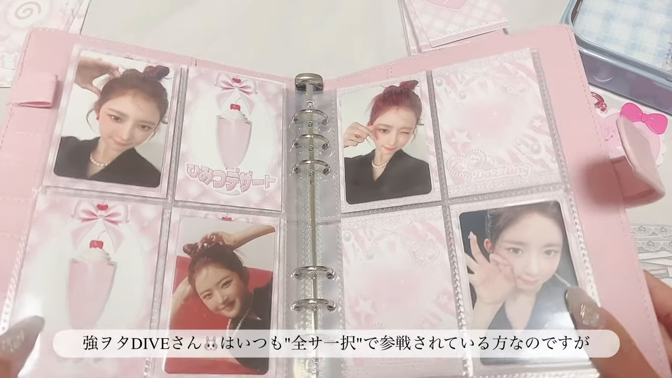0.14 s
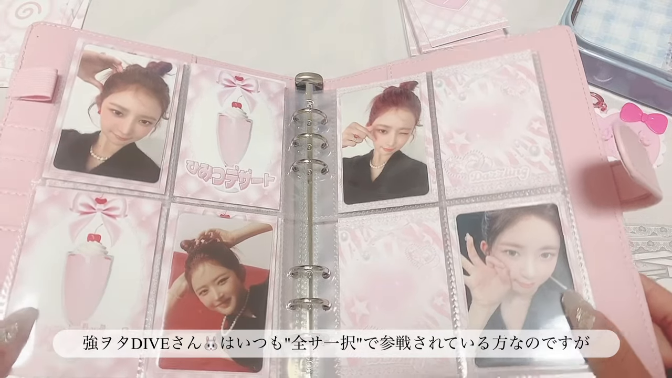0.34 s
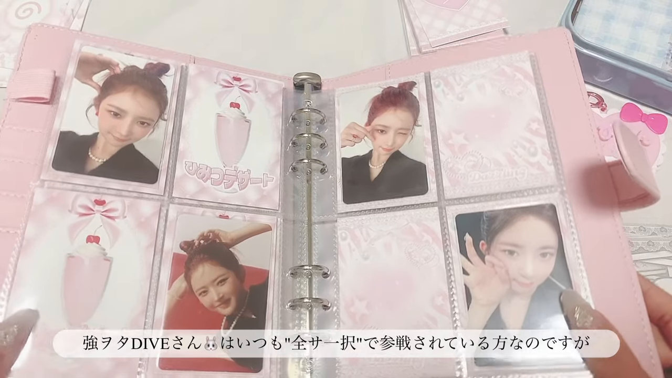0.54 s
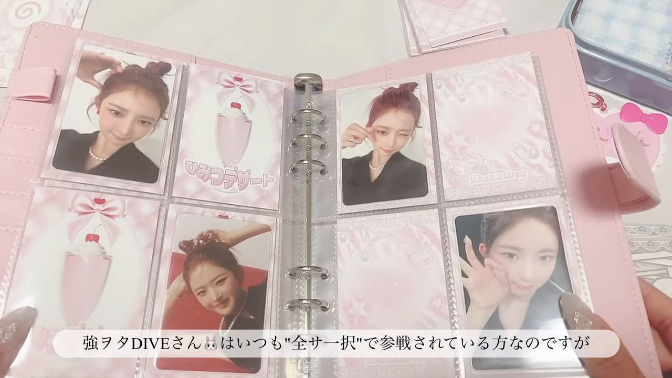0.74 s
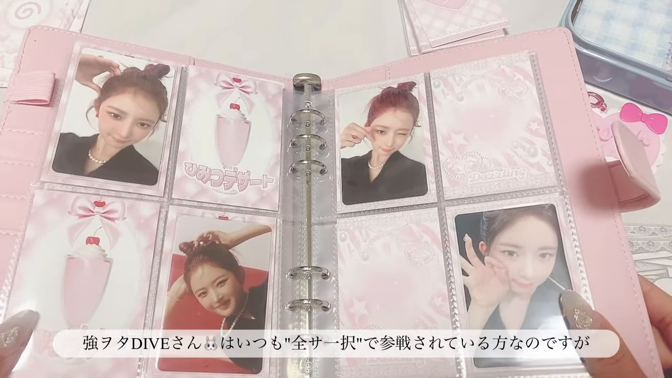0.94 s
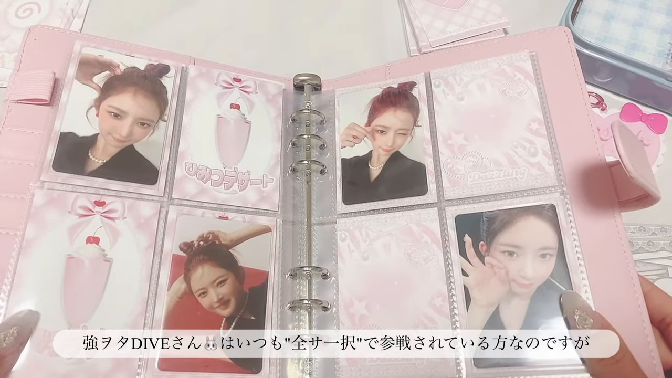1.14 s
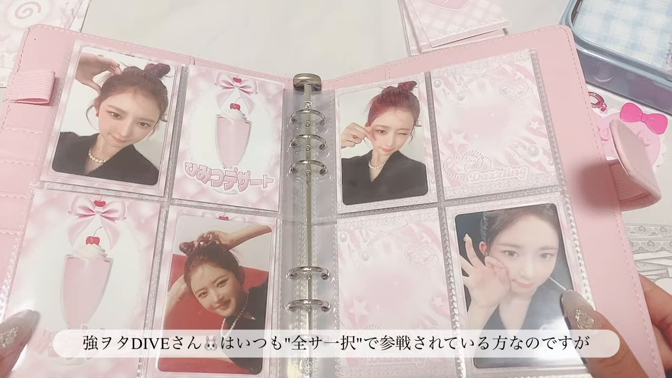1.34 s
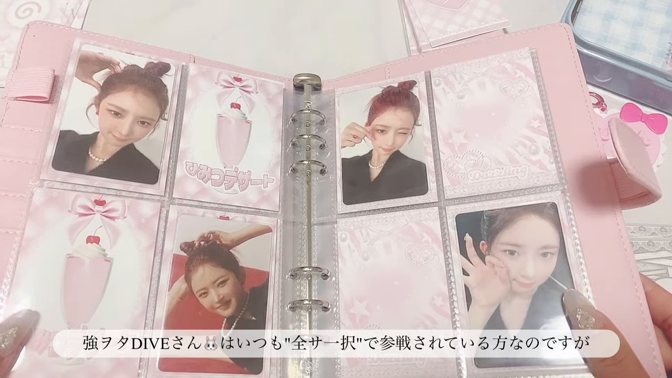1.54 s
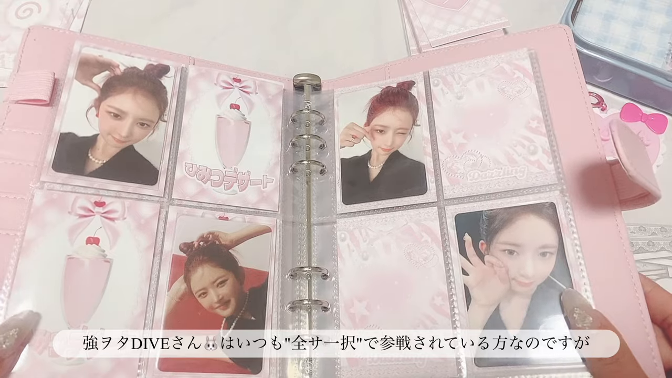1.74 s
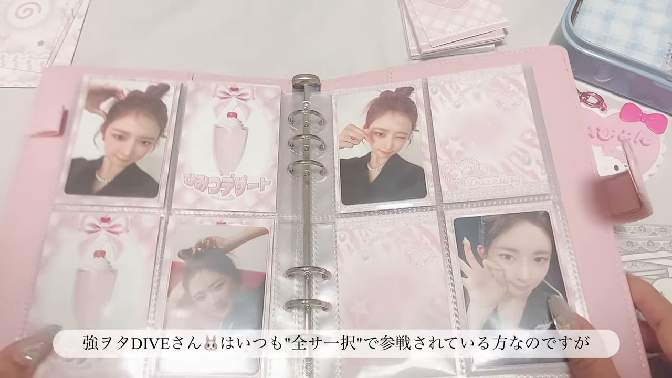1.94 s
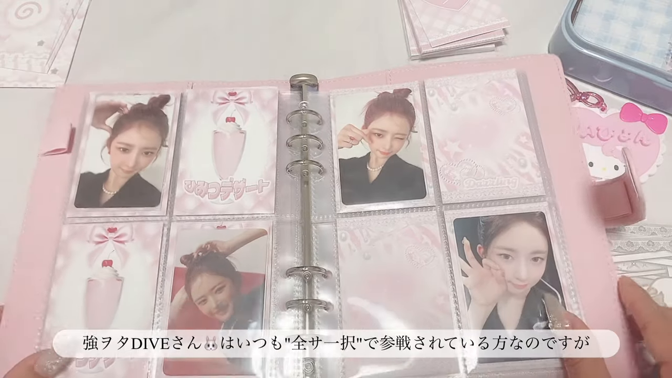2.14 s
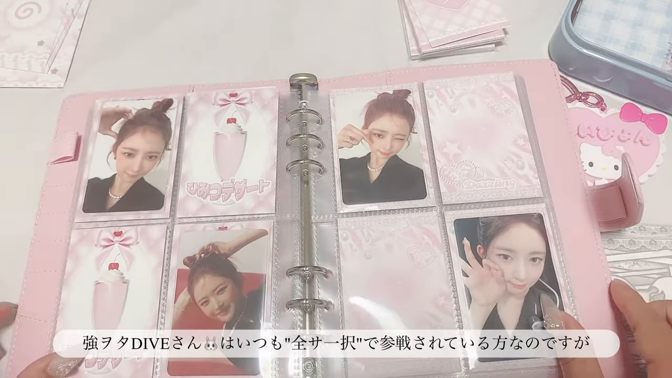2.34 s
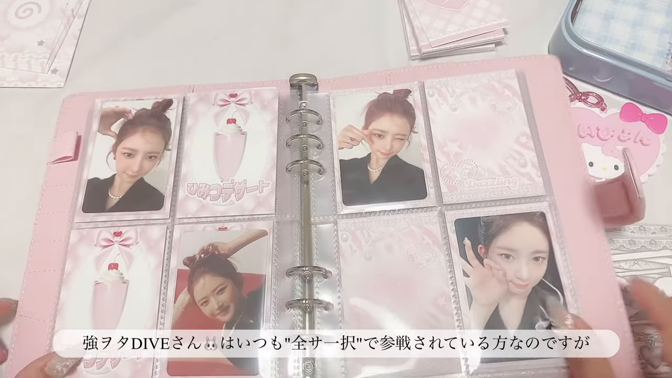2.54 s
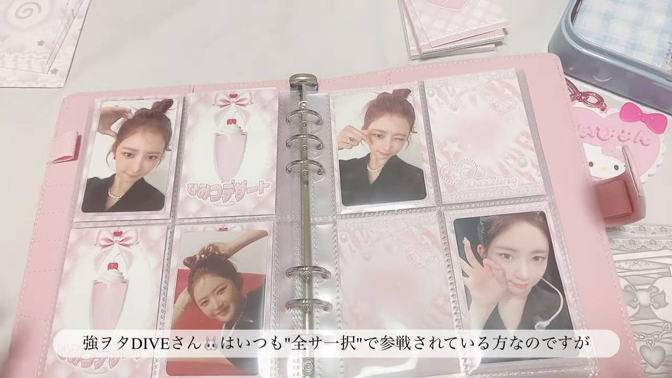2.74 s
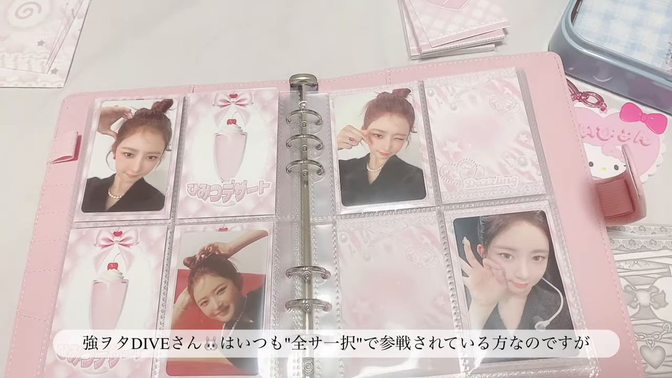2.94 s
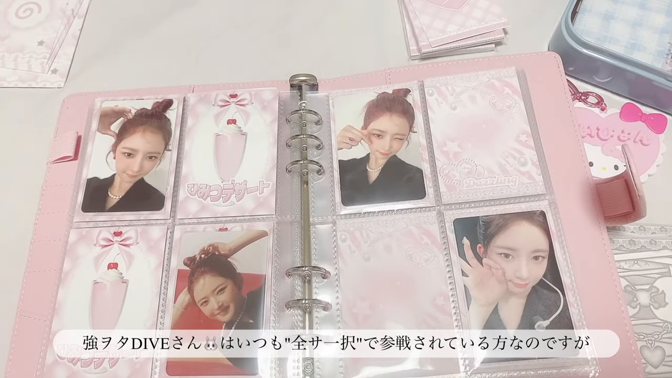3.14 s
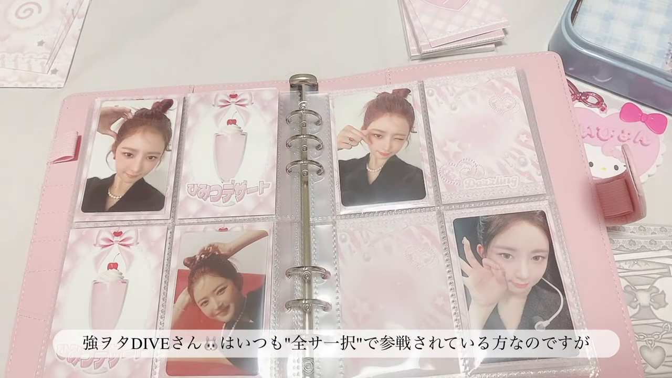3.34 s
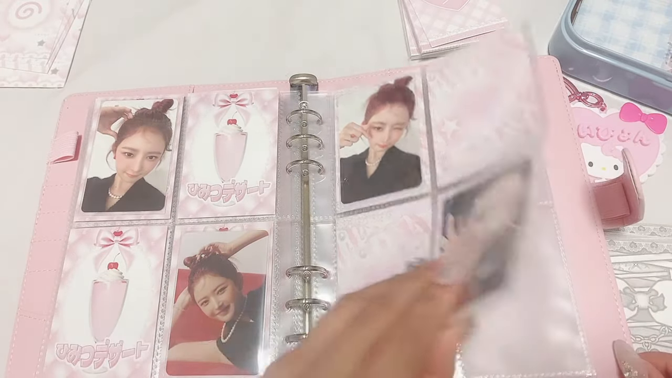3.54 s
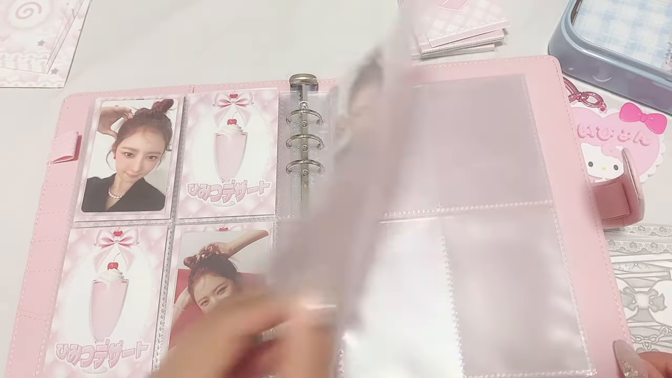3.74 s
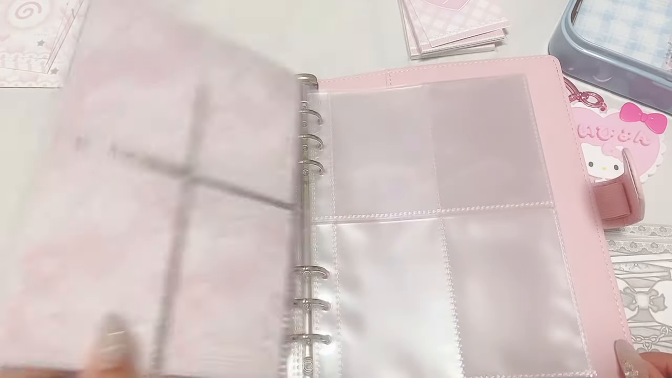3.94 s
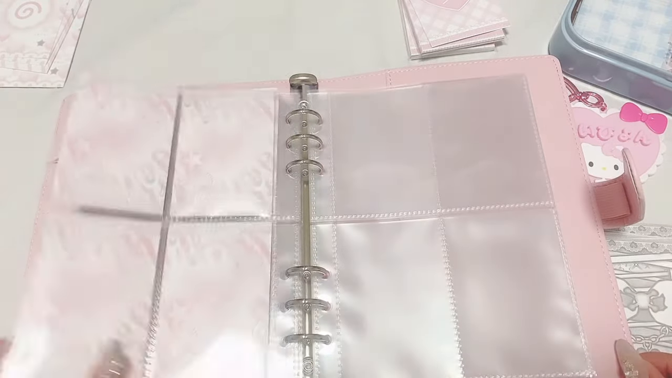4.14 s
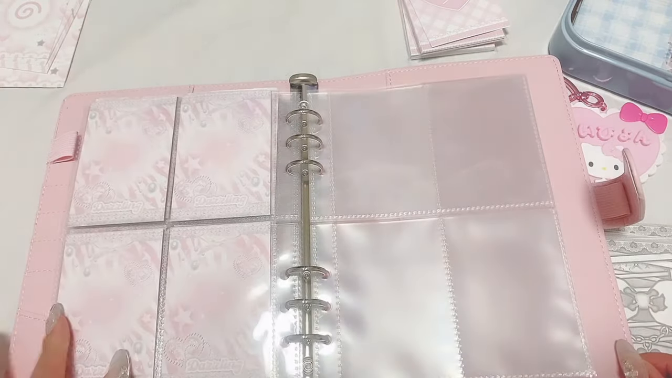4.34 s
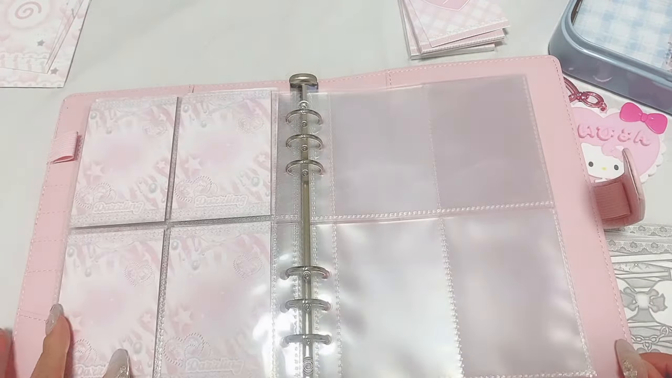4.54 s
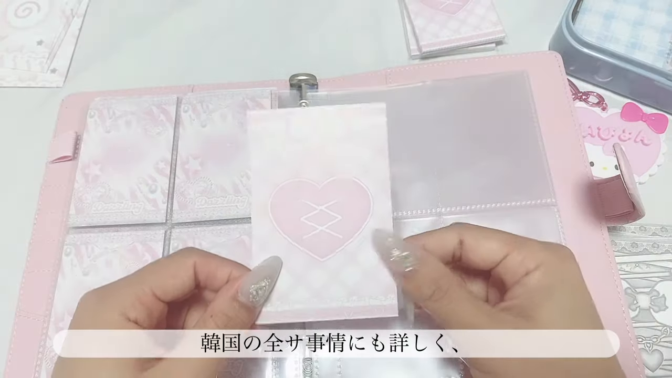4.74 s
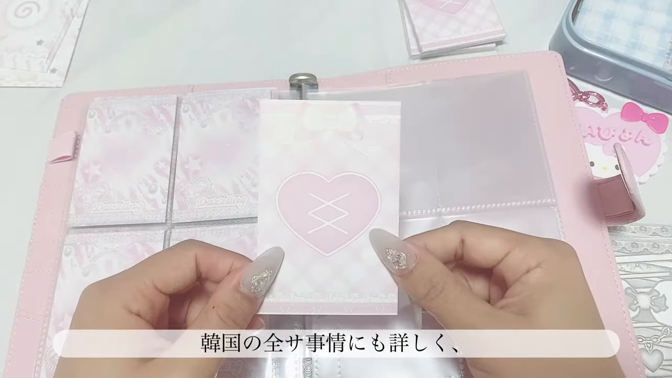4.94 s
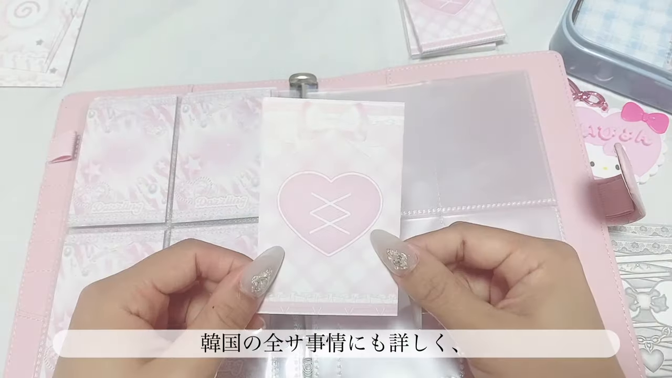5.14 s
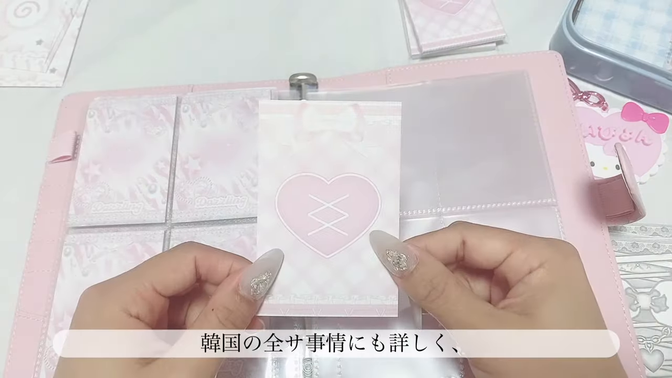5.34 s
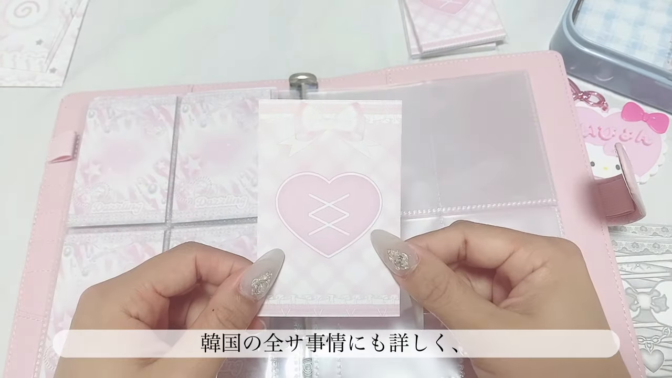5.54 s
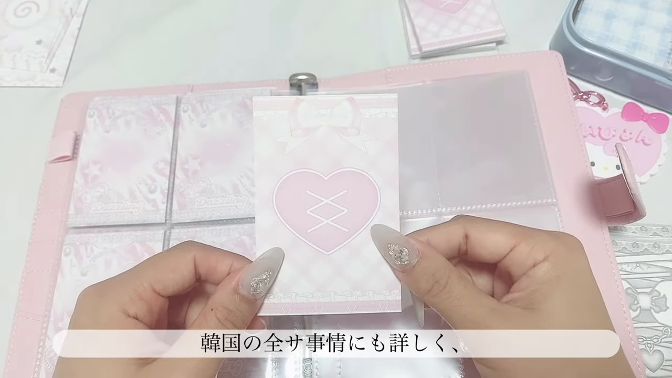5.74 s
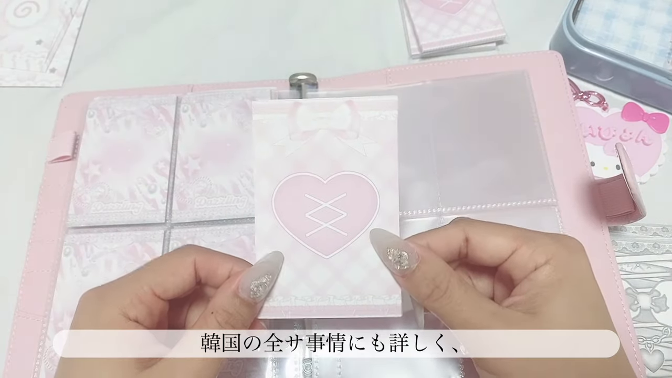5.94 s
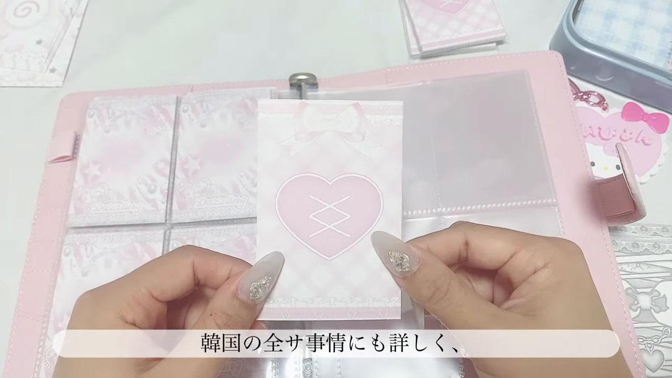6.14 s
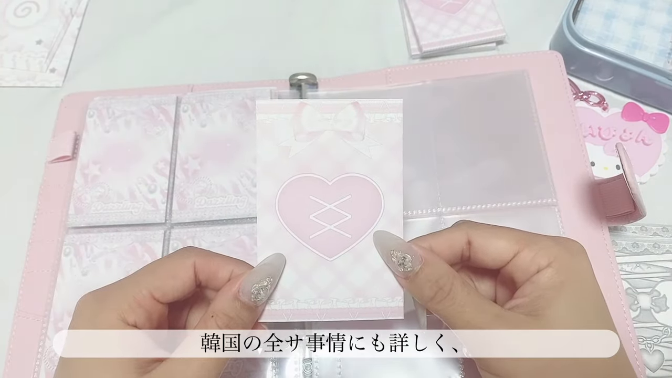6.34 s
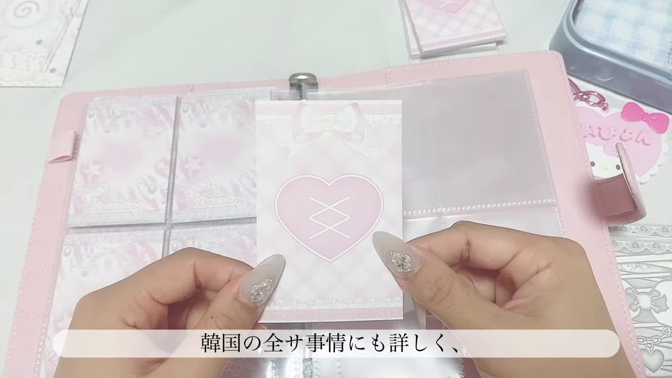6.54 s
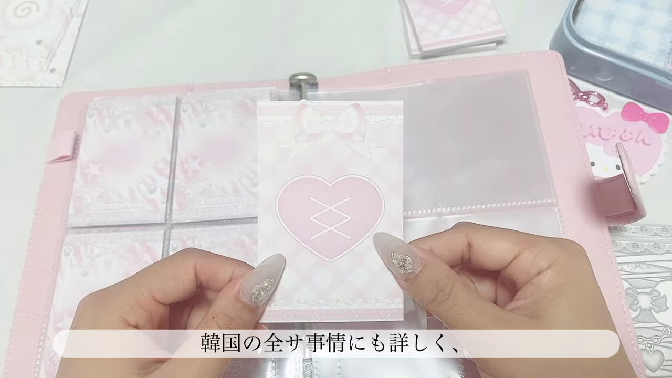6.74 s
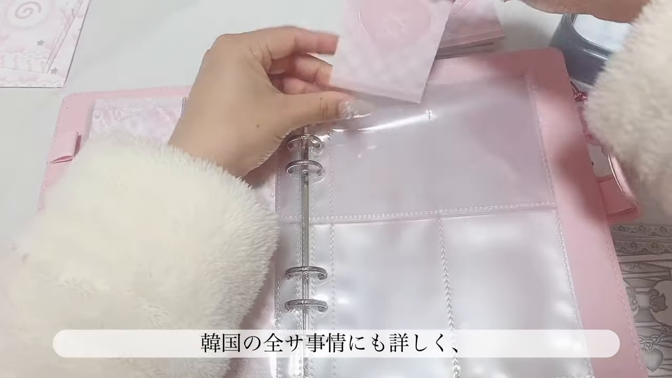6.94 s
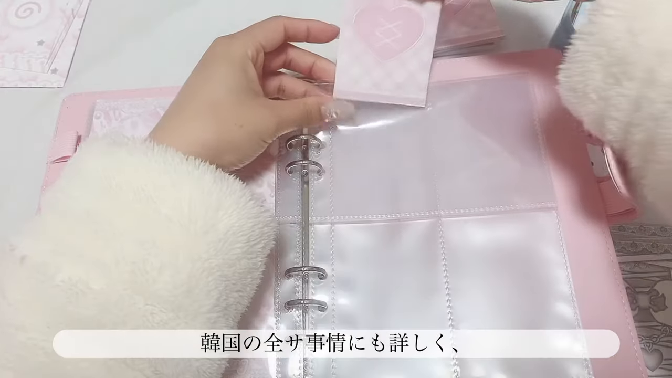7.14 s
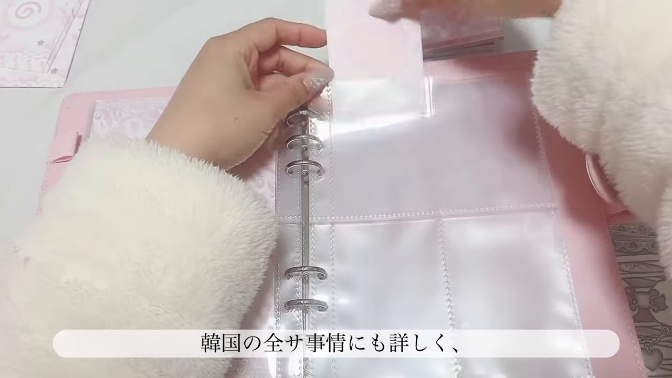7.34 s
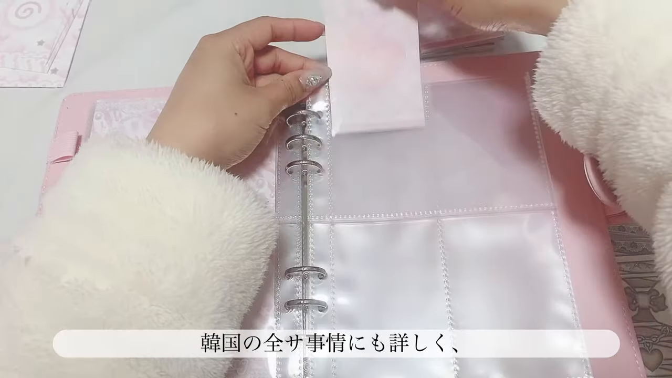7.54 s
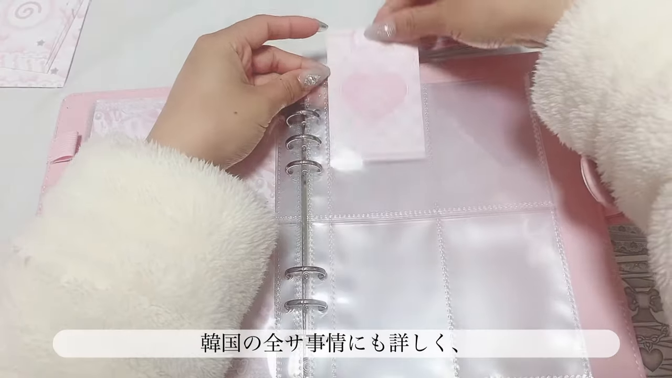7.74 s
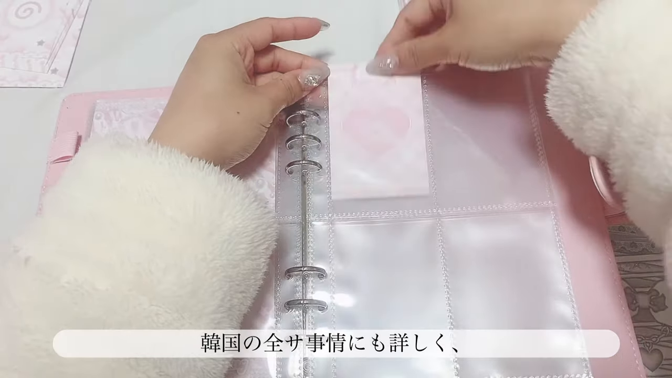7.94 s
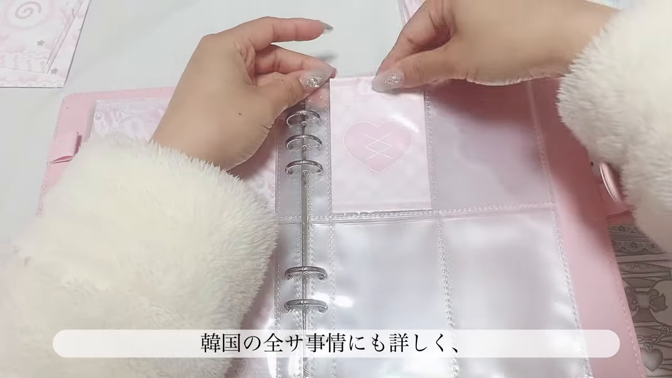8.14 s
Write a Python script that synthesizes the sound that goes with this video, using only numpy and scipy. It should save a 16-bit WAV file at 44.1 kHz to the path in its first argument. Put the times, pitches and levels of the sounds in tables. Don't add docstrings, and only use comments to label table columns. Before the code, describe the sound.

A close, dry, bright sound in a quiet room with faint low hum and hiss. From 0 to 0.8 s, hands make soft brushing rubs on plastic, then near stillness. From about 1.8 s a binder is shifted: small nail ticks, muted knocks and light friction, with a very faint, wavering high whistle of film around 2.4-2.8 s. A brief brighter rub comes at 3.3 s. At 3.7 s a stiff plastic page turns with a very loud crack, a dense crackling run at 3.8 s, and scattered sharp snaps until 4.2 s; it lands with a hard slap at 4.3 s and a smaller settling click near 4.5 s. Faint ticks and tiny squeaks fade by 5 s, leaving quiet. A soft tap at 6.7 s precedes plastic clicks at 6.9 s; a card then scrapes into a pocket, with a knock at 7.4 s, crisp snaps near 7.5 s and rustling slides until 8 s.

```python
import sys
import numpy as np
from scipy import signal
from scipy.fft import rfft, irfft, next_fast_len
from scipy.io import wavfile
from scipy.ndimage import uniform_filter1d

SR = 44100
rng = np.random.default_rng(int(sys.argv[2]) if len(sys.argv) > 2 else 0)


def file_out(sig):
    cols = np.atleast_2d(sig).T
    lim = np.clip(cols, -1, 1)
    pcm = np.round(lim * 32767).astype(np.int16)
    wavfile.write(sys.argv[1], SR, pcm)


def volts(x):
    e = np.asarray(x, float) / 20
    return 10 ** e


N = 361619

# f/Hz, bandwidth/Hz, level/dB
PORT_TOP = [(12500, 1380, -11), (14670, 1400, 1)]
PORT_WIDE = [(7730, 2300, -4), (9400, 980, 2.5), (10940, 780, -3.5)]
SHEET = [(2000, 650, -4), (2700, 290, 1), (3070, 650, -1.5), (4500, 1100, -1), (5400, 400, -0.5),
         (6400, 640, -10.5)]
COVER = [(420, 550, -1.5), (954, 577, 1.7), (1450, 536, -2.5)]


def snaps():
    # t/s, crack peak level/dB, sheet peak level/dB, sheet f/Hz light nail ticks and film
    light_snaps = [(1.8064, -42, -50, 1600), (1.8638, -33.5, -56, 1500), (2.134, -40.5, -60, 2700),
                   (2.1707, -38, -62, 2500), (2.288, -42, -38.5, 5600), (2.5569, -34, -62, 3000),
                   (3.162, -48, -43, 2200), (3.1984, -40, -60, 2000), (3.4008, -31.5, -45.5, 4000),
                   (4.3115, -35, -49, 3000), (4.321, -30, -47, 3000), (4.3229, -33, -46, 3000),
                   (4.3247, -29, -54, 3000), (4.603, -43, -64, 2700), (4.6114, -41, -51, 4900),
                   (4.6227, -44, -63, 6500), (4.6309, -39, -48, 6800), (4.752, -35.5, -53, 1600),
                   (6.0571, -48, -46.5, 3600)]
    turning = [(3.749, -50, -50, 1500), (3.6877, -32, -24, 2800), (3.6935, -14, -43, 2500),
               (3.6968, -33, -47, 3000), (3.7384, -45, -34, 4800), (3.739, -60, -36, 6600),
               (3.7797, -42, -43, 1500), (3.8823, -29, -53, 2300), (3.908, -28.5, -47, 2980),
               (3.9603, -44, -47, 2200), (3.971, -25, -29, 4500), (3.9712, -35, -28.5, 4500),
               (3.973, -33.5, -37, 2920), (3.993, -32, -35, 5000), (4.0109, -19.5, -37, 1100),
               (4.0121, -30, -26.5, 3200), (4.0192, -30, -43, 2110), (4.0227, -37, -47, 1000),
               (4.029, -41, -38, 3470), (4.033, -34, -60, 1700), (4.0754, -36, -41, 5200),
               (4.08, -34, -32.5, 2900), (4.0939, -25.5, -30, 2500), (4.1124, -27, -31.5, 3400),
               (4.1438, -35, -51, 6800), (4.1499, -34, -35, 3500), (4.1539, -40, -26, 5400),
               (4.1814, -26, -35, 5300), (4.1889, -32, -34.5, 4200), (4.236, -50, -57, 1600)]
    inserting = [(6.8642, -34, -41.5, 2500), (6.9416, -34, -40, 3000), (6.9676, -35, -29.5, 4300),
                 (6.971, -46, -34, 5300), (7.2444, -38, -56, 2500), (7.3008, -42, -45, 2500),
                 (7.323, -41, -32.5, 5740), (7.3852, -44, -42, 4000), (7.4469, -46, -43, 2000),
                 (7.4754, -28, -27, 4500), (7.4816, -30, -34, 4470), (7.4936, -36, -47, 6100),
                 (7.6113, -46, -44, 5300), (7.629, -50, -59, 2000), (7.7361, -50, -42, 3300)]
    creasing = [(3.8008, -28, -24, 3000), (3.8091, -17, -24, 4300), (3.8102, -18, -30, 3000),
                (3.8122, -21, -29, 3000), (3.8136, -22, -32, 4000), (3.8146, -17, -26, 3000),
                (3.8153, -14, -26, 2800), (3.8178, -16, -28, 3000), (3.8203, -14, -24, 5000),
                (3.8225, -18, -29, 5000)]
    # f/Hz, bandwidth/Hz, level/dB
    port = [(7400, 2120, -2), (9800, 1340, 5), (11560, 1360, -26)]

    events = np.array(light_snaps + turning + inserting + creasing)
    crack_db, sheet_db, hz = events[:, 1:].T
    lifted_db = np.where(np.arange(len(events)) < len(light_snaps), -8.0, 0)
    pitch_db = 3.5 - 9.5 * np.log2(hz / 1500)
    cover_db = sheet_db + lifted_db + pitch_db - 0.44 * (sheet_db + 28)

    bright = bursts(events, crack_db, modes=port, t60=0.0054, tail_db=-29.5, tail_t60=0.08,
                    spread_db=-2.5, gain_db=2.0, focus_db=35.0, reach=0.27)
    top = bursts(events, crack_db, modes=PORT_TOP, t60=0.0047, tail_db=-26.5, tail_t60=0.085,
                 spread_db=-1.5, gain_db=-7.0)
    sheet = bursts(events, sheet_db, modes=SHEET, t60=0.0054, tail_db=-29.5, tail_t60=0.049,
                   spread_db=0.0, gain_db=1.5, focus_db=13.5)
    cover = bursts(events, cover_db, modes=COVER, t60=0.004, tail_db=-20.0, tail_t60=0.058,
                   spread_db=4.5, gain_db=1.0)
    return bright + top + sheet + cover


def bursts(events, peaks_db, modes, t60, tail_db, tail_t60, spread_db, gain_db, focus_db=0., reach=4.0):
    t = np.arange(SR // 12) / SR
    shape = (len(events), len(t))
    spray = rng.standard_normal(shape) * volts(-60 * t / t60) * (1 - np.exp(-t / 0.000061))
    spray += 5.0 * np.eye(1, len(t), round(SR / 5000))
    force = spray + volts(tail_db - 60 * t / tail_t60) * grains(4550, 2.255, size=shape)

    strengths_db = spread_db * rng.standard_normal((len(events), len(modes)))
    octaves_away = np.abs(np.log2(np.array(modes)[:, 0] / events[:, 3:]))
    nearness_db = -focus_db * np.minimum(octaves_away, reach)
    drives = [force * gain[:, None] for gain in volts(strengths_db + nearness_db).T]
    rings = body(drives, modes)
    rings *= (volts(peaks_db + gain_db) / np.abs(rings).max(axis=1))[:, None]

    out = np.zeros(N + len(t))
    for start, ring in zip(events[:, 0], rings):
        out[round(start * SR):][:len(t)] += ring
    return out[:N]


def pops():
    # f/Hz, bandwidth/Hz, level/dB
    NAIL = [(960, 380, -1.5), (1870, 330, 8), (3070, 760, -2), (4200, 1300, -25), (5500, 300, -18),
            (9260, 610, -29)]
    CORNER = [(2520, 230, -15), (4500, 420, -8.5), (5800, 220, -12), (8200, 690, -7), (9900, 600, -1),
              (11900, 710, -1), (14200, 830, -6), (15400, 180, -7)]
    LIFT = [(1160, 280, -29.5), (2000, 1020, -21), (3230, 640, -12), (5480, 700, -14.5), (7540, 900, -21.5),
            (9570, 760, -1.5), (10620, 500, -17), (11850, 600, -13), (13760, 600, -17)]
    FOLD = [(651, 490, -21), (2900, 230, -17.5), (6650, 400, -10), (8850, 1150, 4.5), (14270, 820, -12),
            (15140, 400, -12.5)]
    REFOLD = [(1700, 620, -17), (3226, 1300, -7), (5200, 720, -8), (7060, 450, -23), (9400, 1900, -4),
              (11800, 460, -8.5), (13900, 340, -22), (15200, 690, -19)]
    SPINE = [(797, 380, -7.5), (1780, 370, -1), (2490, 220, -5), (3180, 380, -9.5), (4320, 320, -10),
             (5600, 330, -12), (6960, 800, -7.5), (8650, 240, -6), (10200, 560, 0), (15000, 760, -11)]
    SWING = [(1900, 370, -11), (3030, 440, -12), (5530, 330, -16), (7460, 540, -7), (9170, 470, -3),
             (10600, 530, 0), (14800, 340, -6.5), (15360, 220, -4)]
    LANDING = [(450, 630, -17.5), (950, 260, -16.5), (2190, 600, -11.5), (4900, 1040, -7.5),
               (7000, 230, -18), (7600, 320, -23), (9500, 1800, -1), (12500, 500, -11), (14200, 830, -11)]
    SETTLING = [(2500, 640, -15), (3200, 800, -10.5), (4300, 760, -12), (5260, 600, -9), (6130, 600, -18),
                (8350, 2200, -1), (11500, 1300, -12), (13800, 1160, -5.5)]
    MOUTH = [(2200, 980, -13.5), (4600, 700, -6), (5450, 510, -5), (7060, 900, -6), (9630, 640, -1.5),
             (11400, 1200, -9), (14500, 1200, -12)]
    LAST = [(2300, 990, -17.5), (3600, 700, -14), (4900, 300, -3), (6500, 540, -12), (8300, 500, -7),
            (9600, 430, 0), (10300, 400, -3), (11000, 400, -2), (12100, 620, -7), (13400, 550, -7)]
    EDGE = [(700, 330, 0), (1500, 980, -7), (2800, 750, -2), (4500, 1100, 1), (6000, 1000, -3),
            (9500, 1400, -1), (14000, 1500, -9)]
    # t/s, peak level/dB, patch
    buckles = [(1.7694, -29, NAIL), (2.8253, -22.5, CORNER), (3.1722, -25, EDGE), (7.3171, -32.5, NAIL),
               (7.4428, -22.5, EDGE), (3.6788, 1.5, LIFT), (3.8164, -3, FOLD), (3.819, -3.5, REFOLD),
               (3.8298, -7.5, SPINE), (3.8659, -13, SWING), (4.3095, -6, LANDING), (4.4785, -14, SETTLING),
               (6.9643, -17, MOUTH), (7.4717, -16.5, MOUTH), (7.476, -17.5, MOUTH), (7.479, -20, MOUTH),
               (8.1848, -23, LAST)]

    widening = 1.48
    out = np.zeros(N + SR)
    t = np.arange(SR // 12) / SR
    spray = volts(-21 - 60 * t / 0.007)
    tail = volts(-40.5 - 60 * t / 0.12)
    noises = rng.standard_normal((len(buckles), len(t)))
    for (start, peak_db, patch), noise in zip(buckles, noises):
        force = (t == 0) + (spray + tail) * noise
        ring = 0
        for hz, width_hz, db in patch:
            once = resonance(force, hz, widening * width_hz)
            ring = ring + volts(db) * resonance(once, hz, widening * width_hz)
        out[round(start * SR):][:len(t)] += volts(peak_db) * ring / np.abs(ring).max()
    return out[:N]


def page():
    # peak t/s, rise/s, fall/s, pressure level/dB, weight on sheet and cover/dB
    strokes = [(3.665, 0.016, .03, -44, -10), (3.692, 0.016, 0.054, -38, -5),
               (3.818, 0.045, 0.055, -34.5, -1.1), (3.816, .008, 0.009, -31, -10),
               (3.87, 0.072, 0.089, -42.5, -3.5), (3.97, 0.015, 0.028, -42.5, -0.5),
               (3.99, .015, 0.022, -42, -3.5), (4.022, 0.023, .035, -38.5, -4),
               (4.116, 0.043, 0.03, -44, -1), (4.096, .005, .02, -46, -2), (4.148, .03, 0.024, -38, -4.5),
               (4.2, 0.11, 0.22, -59, -3), (4.323, .009, 0.041, -42.5, -7.5), (4.488, .015, 0.047, -56, -3),
               (4.55, .05, 0.38, -67, -15), (4.618, 0.052, .04, -50, -16), (4.757, 0.11, 0.057, -64, 0)]
    bodies = [(PORT_WIDE, 0, 0), (PORT_TOP, -11.5, -.1), (SHEET, -.5, 1), (COVER, -1, 1.1)]
    return rubbing(strokes, bodies, flutter_db=0.55, patchy_db=2.4, per_s=5000, size_db=2.5, roundness=1.3)


def hands():
    # peak t/s, rise/s, fall/s, pressure level/dB, weight on sheet and cover/dB
    strokes = [(0.0, .05, 0.071, -49.5, -10.5), (0.21, .13, .11, -48, -12), (0.375, 0.094, 0.085, -50, -13),
               (0.56, .095, 0.08, -50, -9), (0.725, 0.07, .14, -55, -12), (1.78, 0.018, .9, -55.5, -0.5),
               (1.917, 0.18, 0.073, -57, -8), (2.07, 0.099, 0.036, -52.5, -8),
               (2.168, 0.066, 0.04, -53.5, -11.5), (2.254, .06, 0.067, -49, -5.5),
               (2.36, 0.074, 0.19, -57, -15), (2.58, .15, 0.15, -51, -11), (2.72, 0.089, 0.09, -60.5, -14),
               (2.87, 0.37, 0.29, -57.5, -1.5), (3.18, 0.095, .15, -53, -5),
               (3.312, 0.035, 0.06, -39.5, -18.5), (3.335, 0.029, .03, -54, -0.5),
               (3.45, 0.21, 0.49, -56.5, -6.5)]
    bodies = [(PORT_WIDE, 0, 0), (PORT_TOP, -10.5, -.2), (SHEET, -1.2, 1), (COVER, -1.5, .9)]
    return rubbing(strokes, bodies, flutter_db=0.9, patchy_db=2.0, per_s=12000, size_db=0.3, roundness=2.07)


def card():
    # peak t/s, rise/s, fall/s, pressure level/dB, weight on pocket and cover/dB
    strokes = [(6.868, .006, 0.11, -46.5, -2.5), (6.935, 0.042, .055, -43.5, -4.5),
               (7.0, .05, 0.14, -57.5, -3), (7.18, 0.11, 0.32, -50, -5), (7.305, 0.19, 0.061, -46.5, -4),
               (7.415, 0.18, 0.19, -50, -6), (7.477, 0.0092, 0.037, -50, 3.5),
               (7.56, 0.059, 0.1, -43, -8.5), (7.68, 0.098, 0.095, -44, -9), (7.81, .07, .15, -47, -10.5),
               (7.9, 0.14, .05, -45.5, -14), (8.0, 0.12, 0.026, -44.5, -8.5)]
    # f/Hz, bandwidth/Hz, level/dB
    card_edge = [(8300, 1550, -4), (9770, 1030, 2.5), (11130, 1300, -3.5)]
    # f/Hz, bandwidth/Hz, level/dB
    air_gap = [(2000, 860, -4), (4070, 940, -1), (5300, 650, 1.7), (6800, 1200, -6.5)]
    bodies = [(card_edge, 0, 0), (PORT_TOP, -16, -1.0), (air_gap, .7, 1), (COVER, -11, .2)]
    return rubbing(strokes, bodies, flutter_db=1.17, patchy_db=1.24, per_s=7000, size_db=1.0, roundness=1.7)


def rubbing(strokes, bodies, flutter_db, patchy_db, per_s, size_db, roundness):
    flutter, patches = drift(40), drift(9.9)
    weight_db = np.array(strokes)[:, 4]
    out = 0
    for modes, base_db, share in bodies:
        pressure = stroked(strokes, base_db + share * weight_db, roundness) * volts(flutter_db * flutter)
        slips = grains(per_s, size_db) * pressure
        drives = [slips * volts(patchy_db * np.roll(patches, rng.integers(N))) for _ in modes]
        out = out + body(drives, modes)
    return out


def knocks():
    # t/s, peak level/dB, f/Hz, t60/s
    contacts = [(1.817, -42, 796, 0.027), (2.053, -37, 810, 0.023), (2.162, -35, 730, 0.021),
                (2.232, -36.5, 610, 0.024), (2.29, -41, 204, 0.037), (2.545, -40.5, 199, 0.06),
                (2.928, -42.5, 202, 0.07), (3.43, -50, 1210, .04), (3.815, -49, 500, 0.025),
                (3.83, -21, 320, 0.02), (3.908, -37, 400, .04), (4.012, -33, 290, 0.11),
                (3.42, -47, 400, .05), (4.09, -38, 700, .03), (4.182, -26.5, 213, 0.034),
                (4.672, -56, 606, .08), (6.66, -37, 332, 0.034), (7.356, -33, 860, 0.025),
                (7.3575, -30.5, 700, 0.065), (7.357, -32.5, 398, 0.08), (7.372, -32, 503, .04),
                (7.373, -35.5, 256, 0.09), (7.386, -39, 640, 0.061), (7.397, -43, 1200, .03),
                (7.4425, -46, 700, 0.034), (7.63, -41, 1500, 0.03), (7.655, -45, 1090, 0.05),
                (7.672, -38, 1310, 0.033), (8.052, -52, 1920, .03), (7.737, -39, 257, 0.045),
                (7.7352, -42, 1200, .02), (7.898, -40, 450, 0.017)]
    out = np.zeros(N + SR)
    t = np.arange(SR // 5) / SR
    twins = rng.uniform(1.66, 1.8, len(contacts))
    for (start, db, hz, t60), twin in zip(contacts, twins):
        phase = 2 * np.pi * hz * (0.658 * t + 0.36 * 0.014 * (1 - np.exp(-t / 0.012)))
        shape = (1 - np.exp(-t / 0.00071)) * volts(-60 * t / max(t60, 0.01))
        i = round(start * SR)
        out[i:i + len(t)] += volts(db - 4.0) * shape * (np.sin(phase) + 0.15 * np.sin(twin * phase))
    return out[:N]


def sweep():
    # start t/s, stop t/s, f/Hz, bandwidth/Hz, level/dB
    gaps = [(3.86, 4.04, 4500, 690, -53), (1.775, 1.92, 830, 760, -64.5), (4.008, 4.052, 480, 670, -51),
            (3.957, 4.0, 2200, 1500, -56), (7.625, 7.7, 1150, 540, -57.5), (7.52, 7.74, 5330, 450, -57),
            (7.55, 7.8, 3860, 500, -63), (7.85, 8.015, 3800, 490, -61.5), (7.86, 7.93, 5050, 680, -57),
            (7.95, 8.018, 4700, 580, -53.5), (7.53, 7.62, 11000, 1500, -48), (7.79, 7.92, 10800, 2000, -49),
            (3.775, 3.81, 1100, 700, -45), (3.405, 3.465, 1060, 640, -57), (7.895, 7.915, 630, 700, -50)]
    out = np.zeros(N)
    noises = rng.standard_normal((len(gaps), SR // 2))
    for (start, stop, hz, width_hz, db), noise in zip(gaps, noises):
        hiss = rms_one(resonance(resonance(noise, hz, width_hz), hz, width_hz))
        i, j = round(start * SR), round(stop * SR)
        out[i:j] += volts(db) * np.sqrt(np.hanning(j - i)) * hiss[i - j:]
    return out


def squeals():
    # start t/s, length/s, from f/Hz, to f/Hz, level/dB
    short_squeals = [
        (3.437, 0.22, 6450, 7300, -69),
        (3.535, .095, 9150, 9000, -63),
        (4.78, .13, 9100, 8900, -69),
        (4.813, 0.091, 8300, 8300, -71),
        (4.823, .095, 7700, 6700, -70),
        (4.67, 0.45, 475, 480, -70.5),
    ]
    # t/s, f/Hz, level/dB
    first_whistle = [
        (2.36, 9500, -66),
        (2.372, 9550, -57),
        (2.388, 9500, -70.5),
        (2.399, 9900, -62),
        (2.43, 10200, -55),
        (2.455, 9900, -59),
        (2.475, 9500, -70),
        (2.487, 9300, -68),
    ]
    # t/s, f/Hz, level/dB
    whistle = [
        (2.487, 9300, -72),
        (2.53, 10300, -58),
        (2.572, 10650, -64),
        (2.605, 10720, -60),
        (2.635, 10200, -66),
        (2.66, 9950, -62),
        (2.72, 9950, -61),
        (2.734, 9620, -61),
        (2.755, 9400, -60),
        (2.79, 9400, -76),
    ]
    glides = []
    u = np.linspace(0, 1, 9)
    for start, span, from_hz, to_hz, db in short_squeals:
        arch_hz = (from_hz + (to_hz - from_hz) * u) * (1 + 0.045 * np.sin(np.pi * u))
        glides.append((start + span * u, arch_hz, db - 6 * (2 * u - 1) ** 2))
    glides += [np.transpose(first_whistle), np.transpose(whistle)]

    out, t, wobble = np.zeros(N), np.arange(N) / SR, drift(60)
    for times, hz, db in glides:
        on = (t > times[0]) & (t < times[-1])
        pitch = uniform_filter1d(np.interp(t[on], times, hz), size=441) * (1 + 0.0016 * wobble[on])
        level = volts(np.interp(t[on], times, db) + 2.5 + 1.8 * wobble[::-1][on])
        out[on] += level * np.sin(2 * np.pi * np.cumsum(pitch) / SR)
    return out


def rumble():
    # peak t/s, rise/s, fall/s, level/dB
    leans = [
        (2.31, .25, 0.069, -51),
        (3.24, 0.85, 0.26, -58.5),
        (3.9, .6, 0.51, -56),
        (4.18, 0.08, .09, -50.5),
        (4.37, 0.13, .25, -63),
        (6.9, .3, 0.67, -59),
    ]
    band = signal.butter(2, [45, 160], "band", fs=SR, output="sos")
    low = signal.sosfilt(band, rng.standard_normal(N))
    weight = np.hypot(volts(-64.5), stroked(leans, 0, roundness=1.11))
    return weight * volts(2.22 * drift(30)) * rms_one(low)


def room():
    # f/Hz, density level/dB
    spectrum = [(25, -41.5), (43, -4), (91, 4.5), (123, -15), (199, -9), (830, -16.5), (4800, -25.5),
                (14500, -19)]
    hz, db = np.transpose(spectrum)
    size = next_fast_len(N)
    f = np.maximum(np.arange(size // 2 + 1) * SR / size, 1)
    colour = volts(np.interp(np.log(f), np.log(hz), db))
    tone = irfft(rfft(rng.standard_normal(size)) * colour, size)[:N]
    return volts(-55.5) * rms_one(tone)


def rms_one(x):
    return x / np.sqrt(np.mean(x ** 2) + 1e-30)


def drift(rate):
    r = np.exp(-2 * np.pi * rate / SR)
    noise = rng.standard_normal(N + SR)
    return rms_one(signal.lfilter([1], [1, -2 * r, r * r], noise)[SR:])


def grains(per_s, size_db, size=N):
    sizes = volts(size_db * np.minimum(rng.exponential(1, size), 4)) * rng.standard_normal(size)
    return rms_one(sizes * (rng.random(size) < per_s / SR))


def resonance(x, hz, width_hz):
    r = np.exp(-np.pi * width_hz / SR)
    zeros = np.array([1, 0, -1]) * (1 - r * r) / 2
    poles = [1, -2 * r * np.cos(2 * np.pi * hz / SR), r * r]
    return signal.lfilter(zeros, poles, x + 1e-18)


def body(drives, modes):
    click = np.eye(1, 2048)[0]
    energy, out = 0, 0
    for k, (drive, (hz, width_hz, db)) in enumerate(zip(drives, modes)):
        energy += np.sum((volts(db) * resonance(click, hz, width_hz)) ** 2)
        out = out + (-1) ** k * volts(db) * resonance(drive, hz, width_hz)
    return out / np.sqrt(energy)


def stroked(rows, offsets_db, roundness):
    t = np.arange(0, N + 64, 64) / SR
    peak, rise, fall, db = np.transpose(rows)[:4, :, None]
    before = (peak - t) / np.maximum(rise, 0.004)
    after = (t - peak) / np.maximum(fall, 0.004)
    away = np.where(t < peak, before, after)
    level_db = db + np.reshape(offsets_db, (-1, 1)) - 15 * away ** roundness
    power = volts(2 * level_db).sum(axis=0)
    return np.interp(np.arange(N) / SR, t, np.sqrt(power))


def scene():
    friction = hands() + page() + card()
    mono = snaps() + pops() + friction + knocks() + sweep() + squeals() + rumble() + room()
    return np.tile(mono, (2, 1))


def band_limit(x):
    return signal.sosfilt(signal.butter(12, 16470, fs=SR, output="sos"), x)


def record(dry):
    low_pass = signal.ellip(10, 0.5, 38, 15780, fs=SR, output="sos")
    mix = signal.sosfilt(low_pass, np.clip(dry, -1, 1))
    return band_limit(mix)


dry = scene()
out = record(dry)
file_out(out)
```